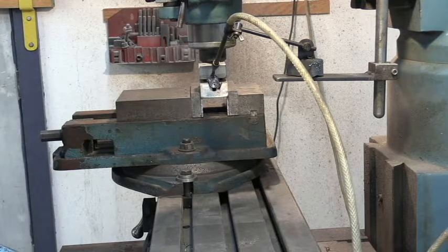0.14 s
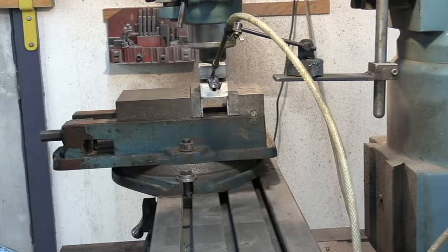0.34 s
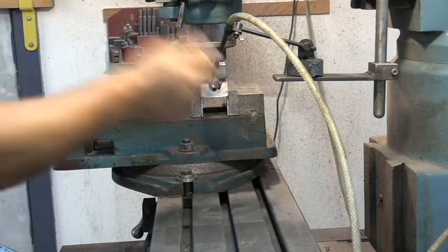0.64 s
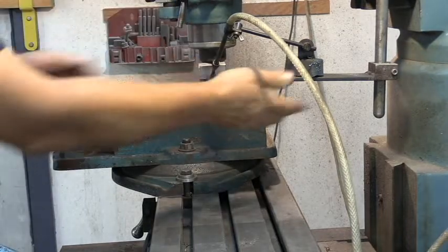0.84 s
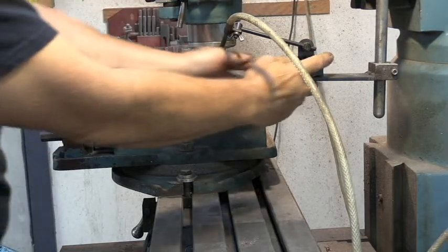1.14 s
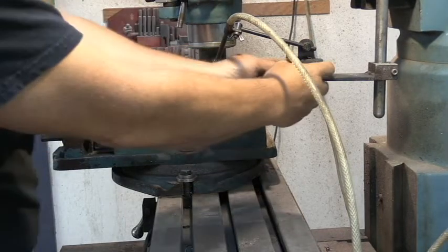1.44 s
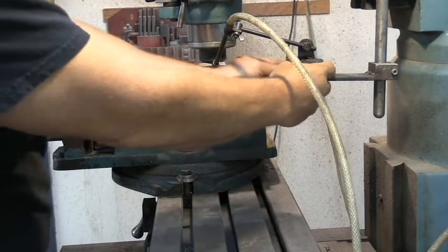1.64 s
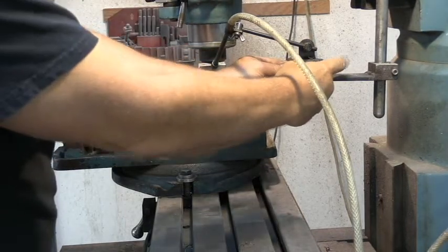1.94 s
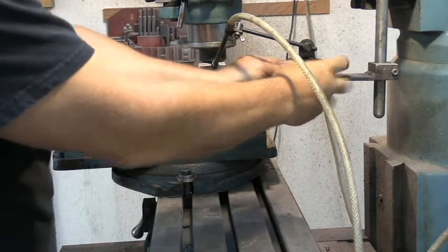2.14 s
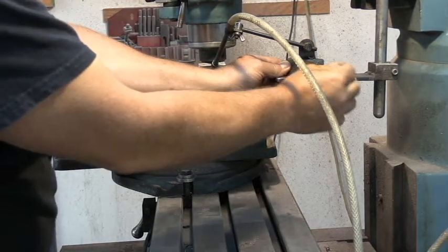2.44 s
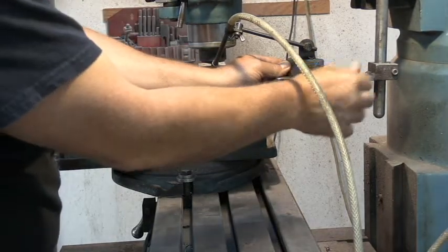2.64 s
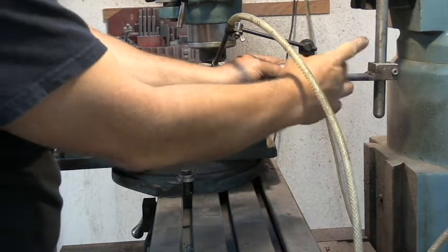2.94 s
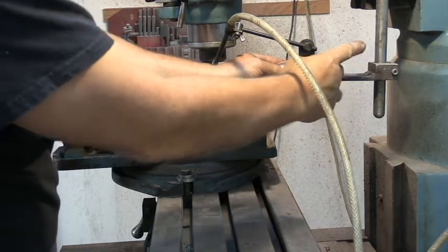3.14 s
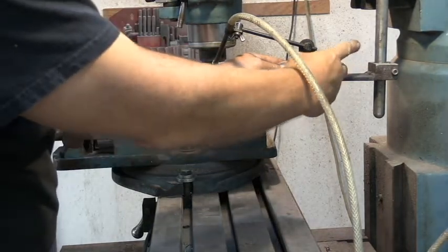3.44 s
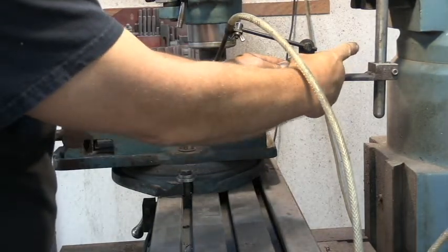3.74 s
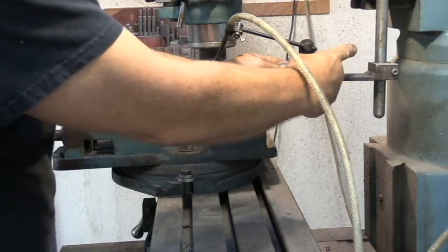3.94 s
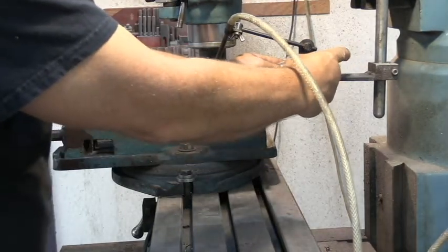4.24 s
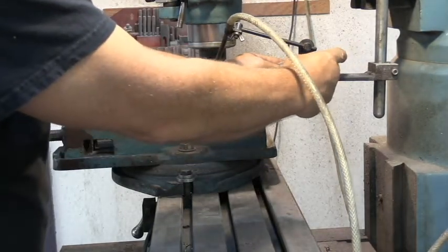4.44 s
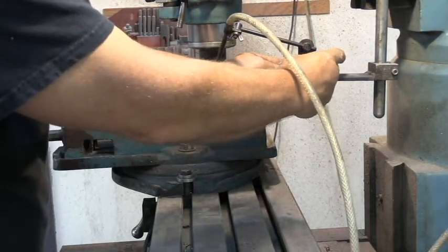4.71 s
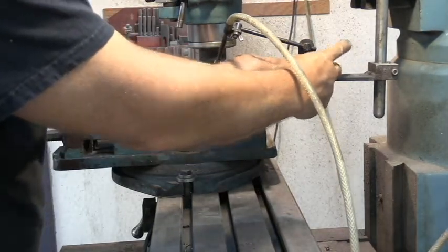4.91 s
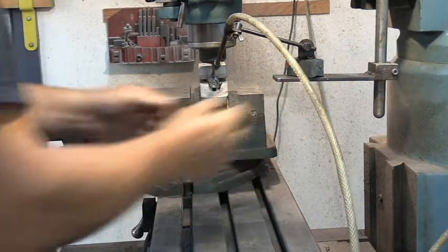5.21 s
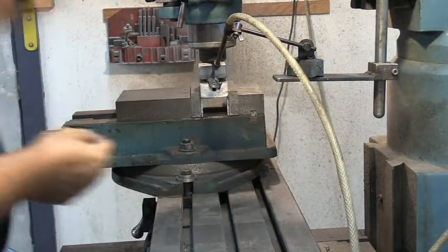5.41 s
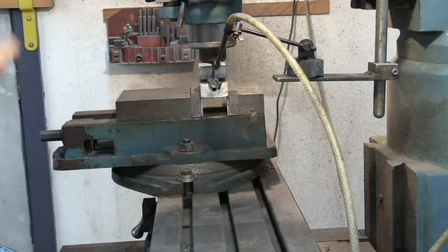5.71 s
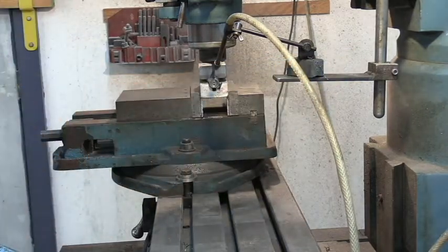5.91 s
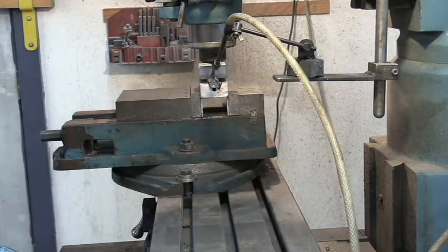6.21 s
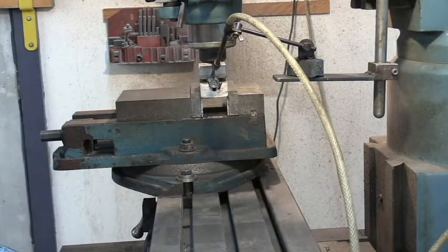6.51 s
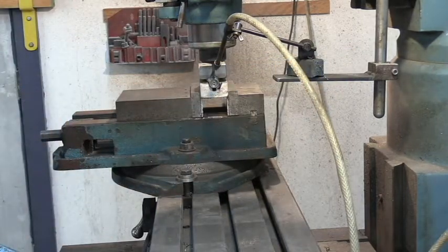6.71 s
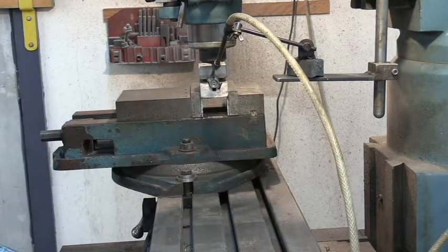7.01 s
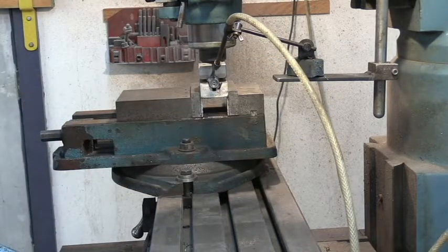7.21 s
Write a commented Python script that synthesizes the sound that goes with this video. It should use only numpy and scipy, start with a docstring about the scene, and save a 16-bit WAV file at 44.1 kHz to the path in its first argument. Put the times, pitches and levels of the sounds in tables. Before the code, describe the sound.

Low machine-room rumble, then a sudden strong rush of pressurised air spraying a milling cutter, its hiss subtly recoloured as hands adjust it.

```python
"""A low workshop rumble runs throughout, as steady shaped noise.
A compressed-air mister cracks to a thin leak, then swells into a hiss onto a milling cutter: turbulent
noise with a low roar that joins late. Hands reach in, turn the valve, cup the jet, turn again, let go and
withdraw; each pose recolours the noise. One microphone with slow gain control hears it all."""
import sys
import numpy as np
from scipy import signal
from scipy.fft import rfft, irfft, next_fast_len
from scipy.io import wavfile
from scipy.ndimage import uniform_filter1d

SR = 44100
rng = np.random.default_rng(int(sys.argv[2]) if len(sys.argv) > 2 else 0)


def output_pcm(signal):
    """Save a mono or channel-first signal as 16-bit PCM at the path in sys.argv[1].

    Samples are clipped to [-1, 1] before scaling.
    """
    pcm = np.clip(np.atleast_2d(signal).T, -1, 1) * 32767
    wavfile.write(sys.argv[1], SR, np.round(pcm).astype(np.int16))


N = 324576
FFT_SIZE = next_fast_len(N)
HZ = np.fft.rfftfreq(FFT_SIZE, 1 / SR) + 1e-3  # just above 0, so its log exists
TIME_S = np.arange(N) / SR


def undb(db):
    """Amplitude gain of a level in dB."""
    return 10 ** (np.asarray(db) / 20)


def unit(x):
    """Scale to rms 1."""
    return x / np.sqrt(np.mean(x ** 2))


def spectrum(points):
    """Gain at every frequency, drawn through (f/Hz, level/dB) points on a log frequency axis."""
    hz, db = np.transpose(points)
    return undb(np.interp(np.log(HZ), np.log(hz), db))


def bell(hz, width_hz):
    """Power response of a resonance: 1 at its centre, one half at the edges of its width."""
    return 1 / (1 + (2 * (HZ - hz) / width_hz) ** 2)


def noise(gain):
    """White noise filtered by a gain at every frequency."""
    white = rng.standard_normal(N)
    return irfft(rfft(white, FFT_SIZE) * gain, FFT_SIZE)[:N]


def walk(rate_hz):
    """Smooth random wander of rms 1: levels held for 1 / rate, then slewed twice."""
    hold = int(SR / rate_hz)
    steps = np.repeat(rng.standard_normal(N // hold + 1), hold)
    smooth = uniform_filter1d(uniform_filter1d(steps, hold), hold)
    return unit(smooth[:N])


def ramp(start_s, length_s):
    """Straight rise from 0 to 1."""
    return np.clip((TIME_S - start_s) / length_s, 0, 1)


# Spectral density of the workshop rumble: f/Hz, level/dB (relative)
RUMBLE_SPECTRUM = [(18, -60), (32, -37), (87, 0), (140, 0), (215, -1), (240, -11), (300, -14.5), (370, -5),
                   (430, -14), (520, -13), (700, -17), (1000, -18), (3000, -29), (8000, -42), (15500, -58)]
RUMBLE_DB = -40.5  # rms, before gain control


def rumble():
    """Steady low workshop rumble: noise through one fixed spectrum."""
    return undb(RUMBLE_DB) * unit(noise(spectrum(RUMBLE_SPECTRUM)))


CRACK_AT_S, CRACK_S, LEAK_DB = 0.11, 0.02, -16  # leak relative to full flow


def valve(swell_at_s, swell_s):
    """Air flow through the valve: it cracks to a thin leak, then swells to full flow."""
    crack = ramp(CRACK_AT_S, CRACK_S) ** 2
    return crack * undb(LEAK_DB * (1 - ramp(swell_at_s, swell_s)))


ROOM_T60_S, ROOM_DB, ROOM_DULL_HZ = 0.25, -7.5, 3000  # wash energy against direct, before dulling


def room():
    """Direct sound plus a decaying wash of echoes, duller in the treble; it ripples the spectrum finely."""
    s = np.arange(SR // 2) / SR
    wash = rng.standard_normal(len(s)) * np.exp(-np.log(1000) * s / ROOM_T60_S)
    wash = undb(ROOM_DB) * wash / np.sqrt(np.sum(wash ** 2))
    return 1 + rfft(wash, FFT_SIZE) / (1 + 1j * HZ / ROOM_DULL_HZ)


# Bands cancelled by echoes off the nearby metal: f/Hz, width/Hz, level/dB
METAL_NOTCHES = [(3010, 116, -5), (3570, 200, -2), (6300, 230, -4), (8870, 300, -1.5), (11900, 500, -3),
                 (13700, 900, -2.5)]
# Narrow resonances of the machine corner, heard in every pose: f/Hz, width/Hz, level/dB
CORNER_RESONANCES = [(393, 26, 2), (468, 38, 1.5), (607, 42, 4), (810, 38, 1), (1057, 32, 2),
                     (1323, 22, 1.5), (2080, 44, 1.5), (2663, 47, 2.5), (3080, 45, 1.5), (4100, 55, -1),
                     (5300, 43, 4), (7940, 40, 0.5)]
BROAD_DB = -0.5  # offset of the broad spectrum against the resonances


def colour(broad, peaks):
    """Gain of one pose: jet spectrum and resonances add in power, then metal and corner shape them."""
    power = (undb(BROAD_DB) * spectrum(broad)) ** 2
    power = power + sum(undb(db) ** 2 * bell(hz, width) for hz, width, db in peaks)
    shaping_db = sum(db * bell(hz, width) for hz, width, db in METAL_NOTCHES + CORNER_RESONANCES)
    gain = np.sqrt(power) * undb(shaping_db)
    return gain / np.sqrt(np.mean(np.abs(gain) ** 2))  # mean power 1


# Course of the poses, one row each; the first row's t and blend are the valve's swell:
# t/s, blend/s, jet level/dB (before gain control), its drift/(dB/s),
# roar against hiss level/dB, its drift/(dB/s) (for 2 s), forearm band level/dB
POSE_COURSE = [(0.15, 0.112, -14.1, -0.2, 0.3, -3.5, 0.1), (0.64, 0.08, -15.5, -1.2, -0.9, 2.1, -1.1),
               (1.856, 0.07, -17, 0.5, -0.3, 0.6, -1.1), (2.8, 0.21, -17, 0.3, 0.2, 0.2, -3.5),
               (4.25, 0.16, -16, 0.5, 1.2, 0.1, -1.5), (4.55, 0.16, -16.2, -2.4, 1.2, -1.5, 0.1),
               (5.1, 0.14, -15.2, -0.1, -0.2, 0.3, 0)]
# Colours of the poses, each a pair of lists:
# broad jet spectral density (f/Hz, level/dB); resonances of vice gap, cutter and hands
# (f/Hz, width/Hz, level/dB)
FIRST_COLOUR = [(150, -55), (250, -24.5), (899, -5), (1210, -7), (2490, 0.5), (2860, -10), (5530, -9),
                (6240, -4.5), (13700, -10), (15600, -8.5)], [(2100, 310, -6), (2540, 260, -2.5),
                (3220, 300, -6), (3950, 240, -3), (5500, 540, -4), (7200, 220, -7), (8320, 360, -8),
                (9900, 350, -3.5), (12900, 31, -10), (15100, 440, -8)]
REACH_COLOUR = [(150, -52), (250, -20.5), (466, -12), (526, -12.5), (915, -7), (2410, -2.5), (3020, -4.5),
                (5820, -4.5), (15600, -9)], [(915, 46, -3), (1320, 61, -10), (1650, 140, -2),
                (2540, 180, 2), (3290, 52, -2), (4070, 39, -4), (5620, 300, -3.5), (7140, 370, -10),
                (9900, 1200, -5.5), (12500, 57, -11), (14900, 350, -9)]
TURN_COLOUR = [(88, -41), (150, -13), (290, -15), (880, -6.5), (1200, -8), (1750, -3.5), (2560, -11),
               (2930, -9.5), (4680, -9), (6260, -10), (15600, -7)], [(916, 61, -2), (1620, 200, -6),
               (2530, 330, -1), (3250, 160, -6), (4070, 80, -7), (4780, 150, -6.5), (8170, 310, -8.5),
               (9440, 180, -4.5), (10770, 530, -8.5), (15100, 220, -9)]
CUPPED_COLOUR = [(88, -40), (150, -10), (239, -18.5), (914, -5), (1950, -11), (2420, -6.5), (2880, -11),
                 (4770, -10.5), (6510, -10), (8060, -9), (15600, -12.5)], [(918, 35, -0.5),
                 (1640, 120, -5.5), (2520, 260, -2), (3250, 230, -9.5), (3920, 200, -11), (4790, 140, -5.5),
                 (6940, 100, -10), (8260, 340, -9), (5650, 300, -13), (9700, 500, -9), (10600, 620, -9),
                 (12900, 230, -17), (13950, 220, -6.5), (15000, 300, -9), (15400, 130, -13)]
TURN_AGAIN_COLOUR = [(150, -46), (250, -16.5), (756, -8), (884, -5), (2410, -2.5), (3350, -4), (3650, -7.5),
                     (5430, -3), (15600, -8.5)], [(2480, 52, 1), (3300, 280, -3), (4700, 48, -3),
                     (5600, 63, -3), (8090, 100, -5), (10300, 64, -1), (13900, 280, -9)]
LET_GO_COLOUR = [(150, -47), (250, -19.5), (947, -5.5), (1410, -9.5), (1590, -1), (1990, -7.5),
                 (2410, -3.5), (9950, -2.5), (15600, -12)], [(2480, 130, -1), (3260, 110, -5),
                 (5500, 290, -3.5), (6400, 65, -1), (8200, 130, -7), (10040, 240, 0.5), (15000, 350, -7)]
OPEN_COLOUR = [(150, -50), (250, -21), (756, -9.5), (868, -10.5), (1700, -4), (2540, -2.5), (6920, -3),
               (8820, -5), (9950, -2.5), (15600, -11.5)], [(906, 70, -4.5), (2550, 250, -1.5),
               (3260, 110, -12), (3830, 290, -3), (5630, 520, -3), (6780, 660, -1.5), (8240, 260, -1),
               (9800, 1000, -1), (11850, 370, -2), (14900, 690, -3.5)]
POSE_COLOURS = (FIRST_COLOUR, REACH_COLOUR, TURN_COLOUR, CUPPED_COLOUR,
                TURN_AGAIN_COLOUR, LET_GO_COLOUR, OPEN_COLOUR)
ROAR_HZ = 2790  # the roar of the jet striking the metal lies below this, the hiss above
ROAR_AT_S, ROAR_S, ROAR_LATE_DB = 0.13, 0.042, -14  # the roar is held back, then joins
ARM_HZ, ARM_WIDTH_HZ = 12050, 600  # band where an echo off the forearm interferes


def jet():
    """Turbulent hiss and roar, blended between poses; droplets make the treble flutter."""
    roar_entry = undb(ROAR_LATE_DB * (1 - ramp(ROAR_AT_S, ROAR_S)))
    surge_db = 0.18 * walk(8.3)
    flutter_db = 0.38 * walk(6) + 0.29 * walk(16) + 0.32 * walk(150)
    low = 1 / (1 + (HZ / ROAR_HZ) ** 8)  # share of power in the roar
    echoes = room()

    # each pose's share of the power: what has faded in and not yet given way to the next
    changed = [ramp(row[0], row[1]) for row in POSE_COURSE[1:]]
    shares = -np.diff([np.ones(N)] + changed + [np.zeros(N)], axis=0)

    out = 0
    for share, pose, row in zip(shares, POSE_COLOURS, POSE_COURSE):
        start_s, _, level_db, drift_db, roar_db, roar_drift_db, arm_db = row
        since_s = TIME_S - start_s
        gain = colour(*pose) * echoes * undb(arm_db * bell(ARM_HZ, ARM_WIDTH_HZ))
        roar_level = undb(roar_db + roar_drift_db * np.clip(since_s, 0, 2)) * roar_entry
        roar = roar_level * noise(gain * np.sqrt(low))
        hiss = undb(flutter_db) * noise(gain * np.sqrt(1 - low))
        pose_level = undb(level_db + drift_db * since_s)
        out = out + np.sqrt(np.abs(share)) * pose_level * (roar + hiss)

    echo_rms = np.sqrt(np.mean(np.abs(echoes) ** 2))
    return out * valve(*POSE_COURSE[0][:2]) * undb(surge_db) / echo_rms


def scene():
    """Rumble and jet at one microphone, which feeds both channels."""
    return np.tile(rumble() + jet(), (2, 1))


GAIN_TOP_DB, GAIN_KNEE_DB = 6.5, -16  # most lift; loudness left unchanged
GAIN_SLOPE, GAIN_S = 0.37, 0.27  # dB of gain per dB away from the knee; averaging time
LOW_HZ, TOP_HZ = 38, 15690  # band edges


def record(dry):
    """Slow gain control lifts what is below the knee and lowers what is above; bass and top are cut."""
    keep = np.exp(-1 / (GAIN_S * SR))
    mean_power = signal.lfilter([1 - keep], [1, -keep], dry[0] ** 2)
    loud_db = 10 * np.log10(mean_power + 1e-9)
    gain_db = np.minimum(GAIN_TOP_DB, GAIN_SLOPE * (GAIN_KNEE_DB - loud_db))
    wet = dry * undb(gain_db)
    bass_cut = signal.butter(6, LOW_HZ, "high", fs=SR, output="sos")
    top_cut = signal.ellip(12, 0.2, 80, TOP_HZ, fs=SR, output="sos")
    return signal.sosfilt(top_cut, signal.sosfilt(bass_cut, wet))


dry = scene()
out = record(dry)
output_pcm(out)
```